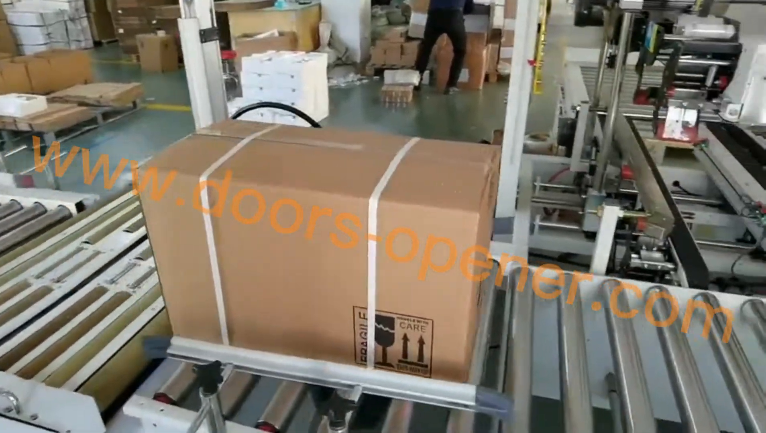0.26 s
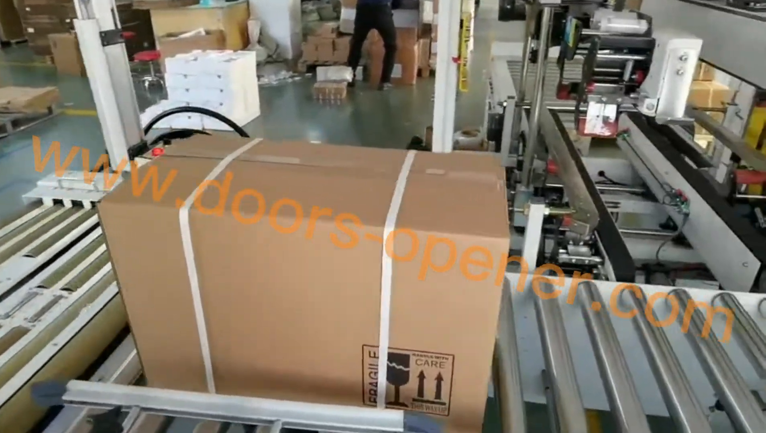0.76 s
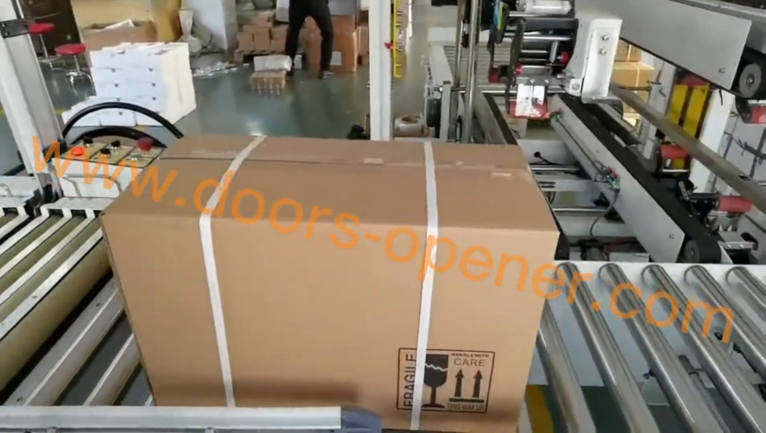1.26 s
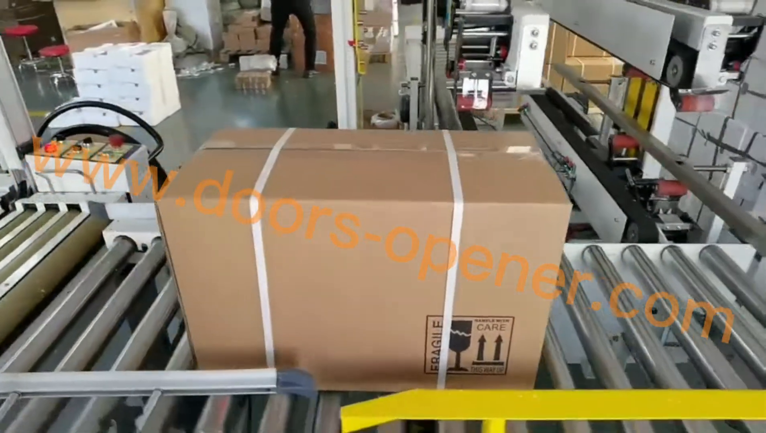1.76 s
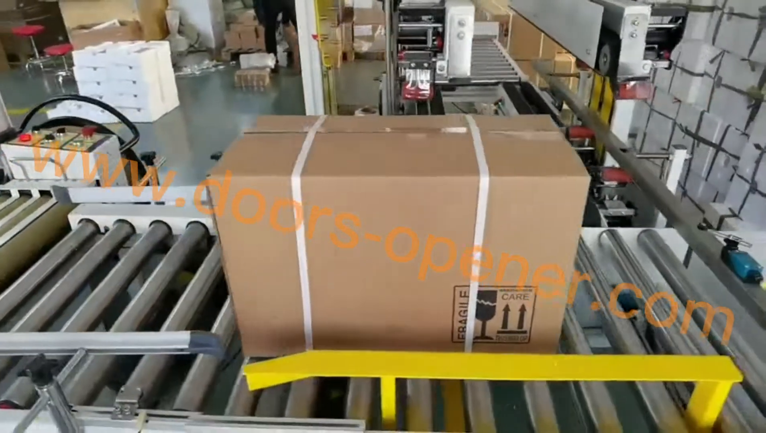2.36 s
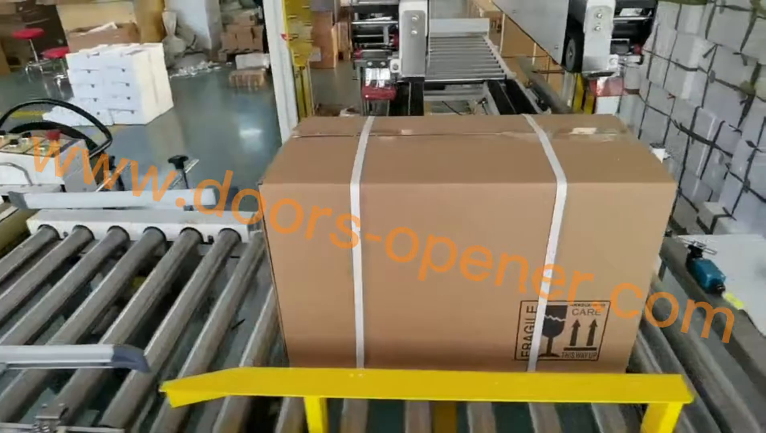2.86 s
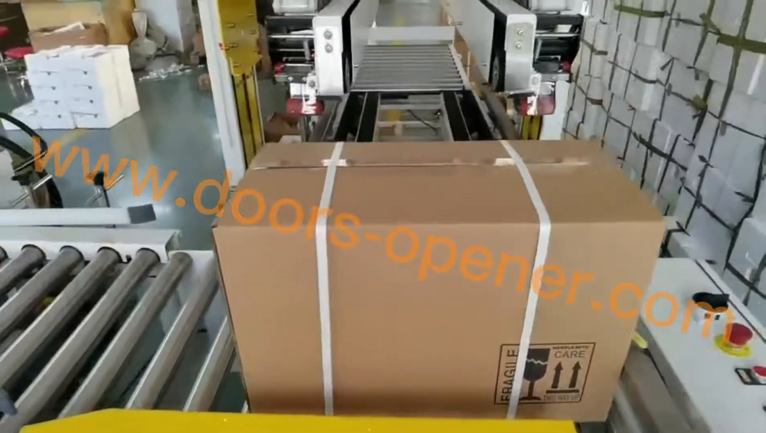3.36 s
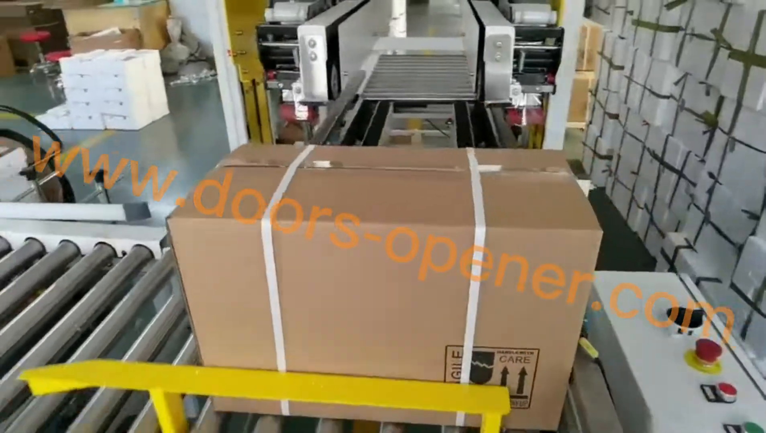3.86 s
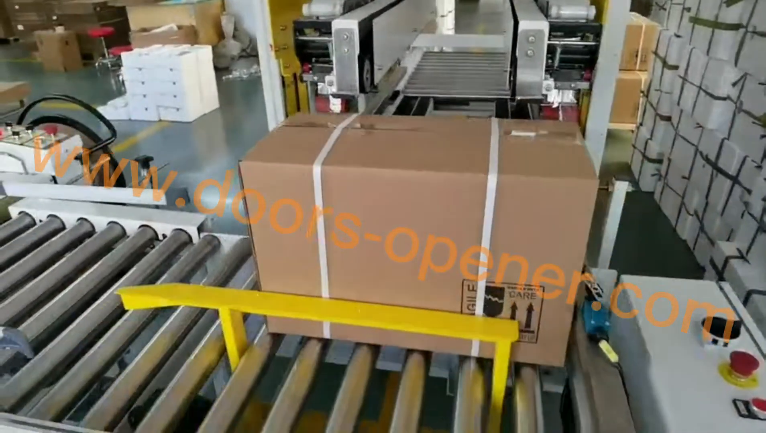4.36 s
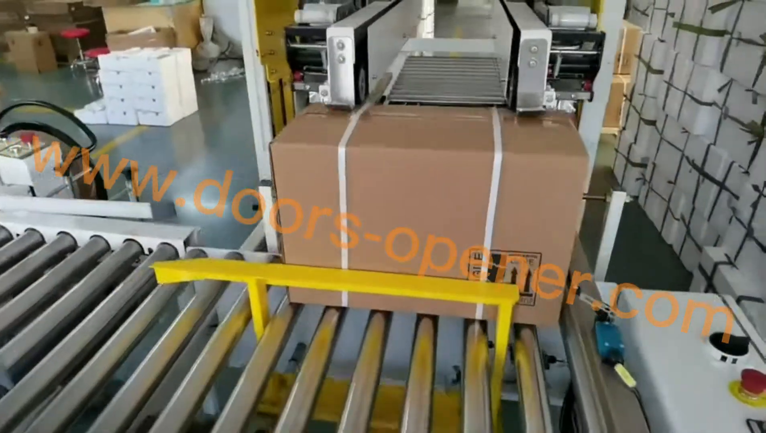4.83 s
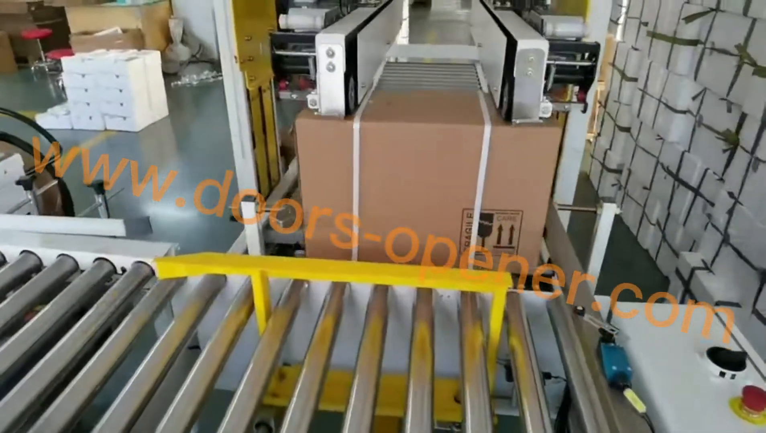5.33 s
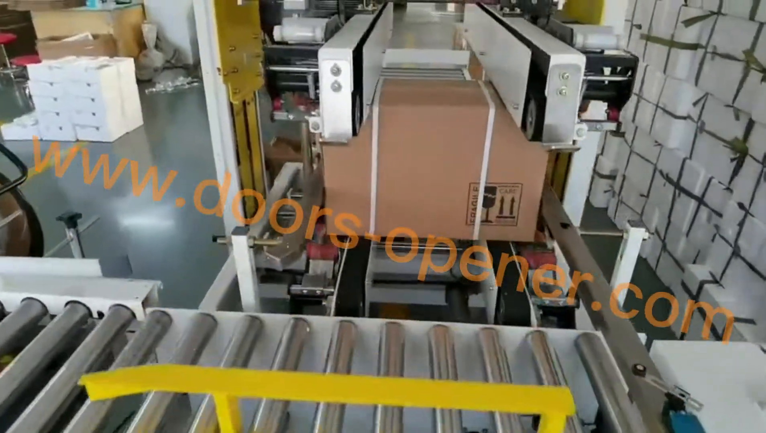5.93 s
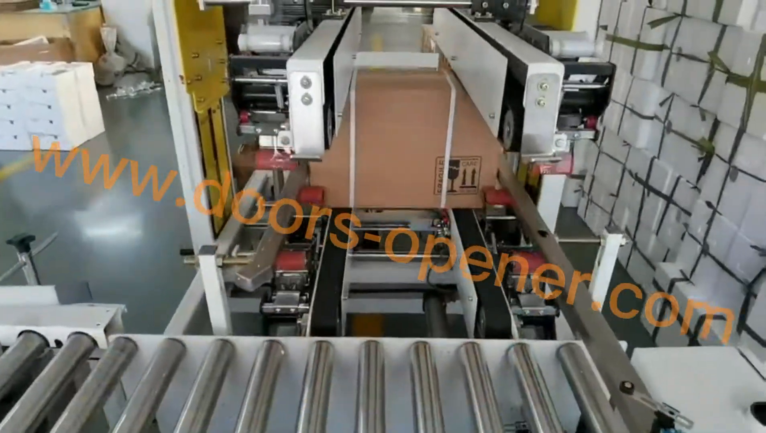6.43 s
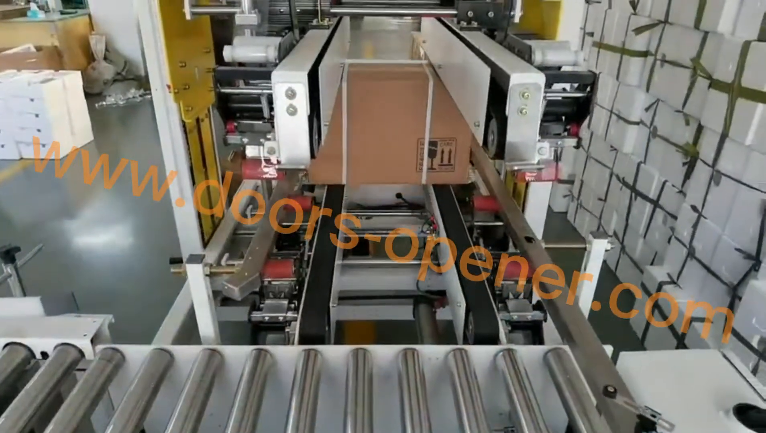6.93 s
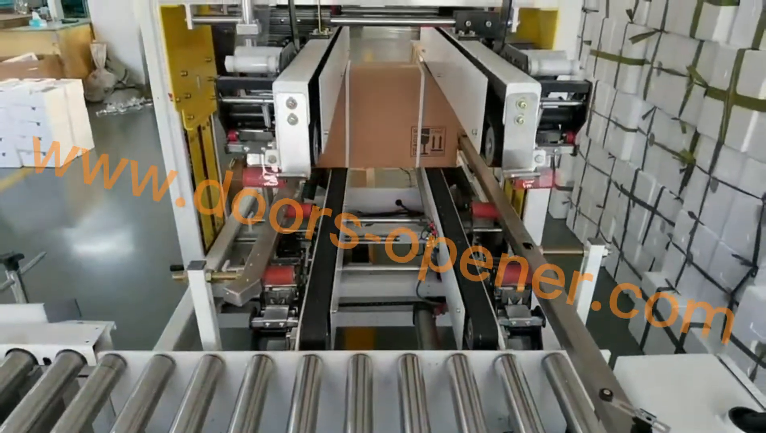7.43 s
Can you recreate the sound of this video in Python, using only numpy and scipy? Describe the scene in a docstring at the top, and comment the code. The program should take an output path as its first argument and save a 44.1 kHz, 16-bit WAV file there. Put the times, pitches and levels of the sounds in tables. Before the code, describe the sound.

Quiet roller hum and metal ticks give way to a sudden loud air burst, knocking cardboard, and long roaring pneumatic hisses, then near quiet.

```python
"""Air valves of a carton sealer vent in long and short blasts: jets of coloured noise with fluttering levels.
A roller conveyor brings the carton: narrow noise bands hum, boom and drone, struck modes thud, metal ticks.
Faint drive whines, gliding narrow noise, sink as the carton turns the corner.
Far leaks and belts fill the large factory hall with coloured hiss."""
import sys
import numpy as np
from scipy import signal
from scipy.fft import rfft, irfft, next_fast_len
from scipy.io import wavfile

SR = 44100
rng = np.random.default_rng(int(sys.argv[2]) if len(sys.argv) > 2 else 0)


def undo_db(level):
    """Turn decibels back into plain size, where 20 dB means ten times bigger."""
    steps = np.asarray(level, float) / 20
    return 10 ** steps


def transcribe(u):
    """Save the signal u as a 16-bit wav file named by the first command-line argument.

    u: samples, shape (n,) or (channels, n), limited to [-1, 1]; the rate is SR.
    q: integer samples, one column per channel.
    """
    v = np.clip(np.atleast_2d(u).T, -1, 1)
    q = np.round(v * 32767).astype(np.int16)
    wavfile.write(sys.argv[1], SR, q)


N = 339129

# hall hiss level: time_s, level_db
HALL_LEVEL = [(0, -42.5), (.5, -44), (1, -41.5), (2, -40.5), (2.85, -39), (3.1, -46), (3.55, -36.5),
              (4, -35.5), (4.6, -34), (4.9, -46), (5.7, -34), (6.0, -42), (6.3, -43.5), (6.7, -47.5),
              (7.69, -48.5)]
# spectrum of the hall hiss: freq_hz, density_db_per_hz (relative, as in all spectra)
HALL_SPECTRUM = [(210, -14.5), (350, -5), (398, 0), (631, -6), (882, -4), (1270, -6), (1870, 2.5),
                 (2570, -5.5), (3010, -1.5), (4010, -4), (6070, 0), (7710, 5.5), (11900, -17), (14600, -19),
                 (15800, -18)]
# resonances on the hall hiss: centre_hz, width_hz, gain_db
HALL_RESONANCES = [(1099, 37, 7), (1710, 63, 2), (3150, 270, 4.5), (4600, 150, 2), (6140, 300, 6.5),
                   (7000, 440, -5.5), (7840, 410, -2.5)]
# likeness of the ears in the hall: freq_hz, shared_power_0_to_1
HALL_LIKENESS = [(60, 1), (180, 1), (550, 0.72), (1650, -0.0), (4970, 0.036), (15000, 0.02)]
# lean of hall sounds: freq_hz, left_minus_right_db
HALL_LEAN = [(60, -3), (180, 4), (550, 2), (1650, 6), (4970, -1), (15000, 5)]
# spectrum of the deep background noise: freq_hz, density_db_per_hz
DEEP_SPECTRUM = [(20, 1), (40, 1), (60, -3), (80, -15), (200, -80)]

# drive whines: start_s, length_s, pitch_hz, end_pitch_hz, level_db
WHINES = [(0.0, 1.6, 306, 302.5, -58.5), (3.48, 0.19, 1640, 1560, -50), (3.66, 0.47, 1840, 1762, -45),
          (3.85, 0.25, 1490, 1407, -46.5), (3.851, 0.14, 402, 371, -45), (4.25, 0.19, 2170, 2130, -43),
          (4.38, 0.13, 1770, 1752, -46)]

# conveyor between jolts: time_s, frame_hum_db, carton_rumble_db
CONVEYOR_IDLE = [(0, -49.5, -53.5), (1.2, -52, -53), (1.45, -62, -51), (2.3, -49, -49), (2.75, -55, -52),
                 (3.3, -48.5, -55.5), (3.85, -53.5, -52), (4.15, -51.5, -58), (4.5, -52, -49.5),
                 (4.85, -59.5, -44.5), (5.0, -60, -51.5), (5.45, -67, -56.5), (5.7, -55, -50.5),
                 (6.1, -57.5, -57), (6.55, -62, -52.5), (6.87, -63, -56), (7.1, -56, -55.5),
                 (7.35, -59, -60), (7.69, -57, -58)]
# frame booms as loads shift: start_s, hold_s, level_db, pitch_hz
BOOMS = [(0.0, 0.071, -42.5, 101.8), (.81, 0.027, -46, 100), (1.055, .02, -56, 100),
         (1.269, 0.016, -47.5, 103.6), (1.323, 0.013, -43, 101), (1.395, .015, -48, 104),
         (1.463, .015, -40.5, 102.3), (1.53, .02, -43, 100), (1.6, 0.017, -43, 96.5),
         (1.777, 0.021, -44, 97), (2.095, .02, -38.5, 102), (2.172, 0.022, -49, 99),
         (2.248, 0.017, -41.5, 100), (2.851, 0.016, -44, 103.4), (2.95, 0.055, -27, 96),
         (3.07, .02, -36, 93.8), (3.141, 0.043, -39, 98.3), (3.444, 0.043, -36, 100),
         (3.569, 0.017, -38, 97.6), (3.617, 0.1, -41.5, 100), (3.753, 0.047, -42.5, 120),
         (3.891, 0.016, -47, 97.7), (3.938, 0.023, -38, 94.8), (4.01, 0.082, -36, 95.3),
         (4.246, 0.06, -32, 102.4), (4.415, 0.031, -38, 101.1), (4.51, 0.016, -41, 97.7),
         (4.595, .02, -37.5, 97), (4.683, 0.018, -35.5, 98.5), (4.807, 0.032, -41.5, 104.2),
         (6.426, 0.032, -35, 96.2), (6.58, 0.039, -49, 102.1), (7.169, 0.048, -46, 93.4),
         (7.245, 0.031, -52.5, 98), (7.429, .05, -54, 100)]
# carton jolts, load drones: start_s, hold_s, level_db, pitch_hz
JOLTS = [(.35, 0.021, -50.5, 157), (.94, .04, -47, 130), (1.302, 0.045, -43, 127), (1.566, 0.064, -44, 145),
         (1.7, 0.055, -47, 227.6), (2.149, .03, -48, 128.4), (2.249, .02, -45, 131.4),
         (2.494, 0.035, -45, 176.6), (2.836, 0.058, -35.5, 166.4), (2.938, 0.021, -34, 124.7),
         (3.04, .02, -41, 136.6), (3.116, 0.046, -35, 167.4), (3.411, .05, -31, 126.2),
         (3.5, .015, -34.5, 165), (3.591, 0.027, -31, 133.6), (3.66, 0.026, -32.5, 148.4),
         (3.733, 0.028, -40, 126), (4.224, 0.088, -28.5, 200.8), (4.36, .09, -41.5, 202.6),
         (4.57, 0.0524, -45.5, 126.4), (4.66, 0.044, -35, 126.7), (4.767, 0.028, -40.5, 145),
         (4.839, 0.023, -37, 168), (5.583, 0.048, -47.5, 221.3), (6.41, 0.074, -48.5, 128),
         (7.172, .04, -49.5, 128.8), (7.658, 0.037, -42.5, 185.5)]
# carton wall knocks: start_s, hold_s, level_db, pitch_hz, rattle_minus_knock_db
KNOCKS = [(0.063, 0.048, -50, 304, -20), (0.413, 0.085, -49.5, 300, -20), (1.279, 0.093, -50, 265, 7),
          (1.607, 0.06, -46, 243, 5.5), (1.682, 0.053, -41, 247, -5), (1.886, 0.073, -47.5, 243, -16),
          (2.254, 0.025, -43.5, 287, -2), (2.483, 0.045, -44, 298.3, -21), (2.834, 0.019, -37, 280.2, -14),
          (2.913, 0.026, -42, 240, 5), (2.969, 0.035, -33, 286.2, -8.5), (3.07, .04, -46, 255, 4),
          (3.127, 0.059, -33, 265, -12), (3.415, .07, -36, 235, -15), (3.584, 0.031, -30, 345.5, -11),
          (3.66, 0.042, -36, 235.2, -8), (3.753, 0.018, -42, 288, -6), (3.862, 0.024, -47, 386.6, -5),
          (4.236, 0.068, -28.5, 238, -19), (4.327, 0.062, -38.5, 292, 0), (4.566, 0.051, -38.5, 237, -0.5),
          (4.68, 0.029, -31.5, 265.4, -4), (4.769, .07, -40, 238, -11), (4.994, .02, -42, 265, -20.5),
          (5.14, 0.11, -45, 386.4, -18), (5.588, 0.051, -39, 255, -13), (5.746, 0.017, -39, 430, -20),
          (6.399, .06, -45.5, 269, -12), (7.118, 0.078, -49, 239.7, -20), (7.655, 0.056, -42, 288.4, -20)]
# spectra of frame, load, walls, loose rollers: freq_hz, density_db_per_hz
BOOM_SPECTRUM = [(18, -63), (30, 9), (59, 4.5), (73, -18), (86, 11.5), (102, 13.5), (124, -18), (150, -8.5),
                 (200, 15), (330, -120)]
LOAD_SPECTRUM = [(68, -12), (115, 10), (129, 4), (204, 4.5), (250, -4.5), (320, -48), (550, -120)]
WALL_SPECTRUM = [(130, -16), (215, -0.5), (231, -9.5), (295, 3), (329, 0.5), (404, -4.5), (520, -16.5),
                 (680, -16), (1140, -120)]
RATTLE_SPECTRUM = [(210, 7), (350, -4.5), (409, 3.5), (579, -12), (657, -2), (715, -3.5), (1000, -7),
                   (1140, -13.5), (1900, -6.5), (2470, -1), (4180, -120)]
# carton thuds: time_s, strike_db
THUDS = [(1.319, -38), (2.27, -29), (2.834, -32), (3.431, -28), (3.577, -15), (3.596, -17), (4.241, -26),
         (4.265, -22), (4.681, -25), (7.116, -37), (7.647, -45.5)]
# modes of carton and frame: freq_hz, gain_db, t60_s
THUD_MODES = [(100, -10, 0.057), (197, 3, .09), (245, 3, 0.1), (371, 0.5, 0.087), (449, 12.5, 0.024),
              (600, 0.5, 0.048), (800, -3, 0.038), (2090, 5, .015)]
# metal ticks: time_s, strike_db, left_minus_right_db
TICKS = [(0.0494, -47, 0.5), (0.195, -23.5, 2), (0.2693, -46, 0.0), (0.5696, -28.5, -1.0),
         (0.6811, -24, -2), (1.0018, -25, 2), (1.3388, -28.5, 4.5), (1.488, -23.5, 5), (1.9207, -27, 0.0),
         (1.987, -25.5, -0.5), (2.1894, -30, 0.0), (2.3692, -21, 2), (2.5094, -32, 2), (2.8543, -25, 2),
         (2.9214, -2.5, 3), (4.2856, -22, -2), (7.1066, -31, 0.0)]
# modes of the metal: freq_hz, width_hz, gain_db
TICK_MODES = [(6260, 810, -6), (8060, 310, 1), (8900, 380, -7), (13000, 2500, -38)]

# far valve puffs: start_s, hold_s, level_db
PUFFS = [(1.564, 0.048, -36), (7.104, 0.0018, -52.5)]
# spectrum of the puffs: freq_hz, density_db_per_hz
PUFF_SPECTRUM = [(290, -46), (500, -18.5), (831, -12), (893, -11.5), (1740, -7.5), (2290, -13.5),
                 (2560, -25), (2780, -10), (3590, -11.5), (9000, -17.5), (11700, -33), (19800, -120)]
# whistles, low rattles and a pipe ring: start_s, length_s, centre_hz, pole_width_hz, level_db
SHORT_BANDS = [(2.837, 0.077, 5250, 1300, -37.5), (2.847, 0.053, 7045, 163, -24.5),
               (2.921, .025, 10030, 300, -20), (2.965, .06, 10100, 76.4, -35),
               (3.01, 0.057, 2890, 150, -34), (3.041, .08, 659, 120, -44), (3.26, 0.045, 2310, 149.4, -37),
               (4.239, 0.039, 7220, 480, -25), (4.2862, 0.0053, 7450, 1172, -15),
               (4.292, 0.0091, 7840, 800, -23), (4.549, 0.053, 808, 100, -47),
               (5.85, 0.14, 910, 199.4, -43), (6.213, 0.035, 4630, 600, -34.5),
               (6.24, 0.053, 4030, 600, -37.5), (6.38, 0.047, 800, 249.4, -41),
               (6.443, 0.054, 874, 152.2, -30.5), (6.492, 0.085, 860, 299, -44)]
# first blast, then the swell into the next: time_s, hiss_db
FIRST_VENT_LEVEL = [(2.8, -52), (2.85, -46), (2.896, -38), (2.904, -30.5), (2.916, -24.5), (2.926, -16.5),
                    (2.952, -16.5), (3.154, -20), (3.418, -25.5), (3.65, -26.5), (3.742, -28), (4.026, -27),
                    (4.116, -25.5), (4.244, -27.5), (4.35, -27), (4.57, -28.5), (4.69, -24), (4.75, -33)]
# spectra of first valve and its throat: freq_hz, density_db_per_hz
FIRST_VENT_SPECTRUM = [(2530, -48), (4300, -10.5), (5200, -13.5), (5550, -7.5), (6260, -6), (6790, -9),
                       (8040, -0.5), (8920, -7.5), (10900, -10), (11800, -21.5), (13900, -25), (15200, -38),
                       (15500, -31), (15800, -46)]
THROAT_SPECTRUM = [(880, -15), (1500, -7.5), (1770, -3), (2020, -1), (2250, 9.5), (3010, 5.5), (3550, 10),
                   (4400, -6.5), (4700, -19), (6110, -34), (10300, -120)]
# sealer cylinder blasts: start_s, hold_s, hiss_db, roar_pipe_extra_db, edge_extra_db
BLASTS = [(4.697, 0.13, -22.5, -6.5, 3), (4.789, 0.069, -31.5, -8, 11.5), (4.859, 0.074, -20, -4, 5),
          (4.961, 0.32, -18.5, -1, 1.5), (5.3, 0.28, -19, -0.5, 2.5), (5.611, 0.16, -19, 0, 2.5),
          (5.8, 0.072, -27.5, -0.5, -6), (5.843, 0.011, -23, -1, -12), (5.854, 0.047, -19, -1, -23),
          (6.0, 0.077, -39.5, -3, 6.5), (6.09, 0.055, -36.5, -4.5, 1), (6.168, .04, -40, -11, 7),
          (6.223, 0.039, -26, -21.5, -2.5), (6.302, .01, -27.5, -10, -8),
          (6.327, 0.0062, -20.5, -10.5, -13), (6.353, 0.034, -24.5, -14, 2), (6.393, 0.07, -18, -1.5, -6),
          (7.686, 0.058, -28.5, -10, 7)]
# jet parts hiss, sizzle, roar, pipe, edge: level_minus_hiss_db, fall_db_per_s, surge_db
JET_PARTS = [(-1.5, 283, 0.36), (-8.5, 192, 0), (-12.5, 157, -0.5), (-17, 130., 0.54), (-9.5, 350., -1.5)]
# rise of the same five parts: rise_db_per_s
JET_RISES_DB_PER_S = 900., 800., 350., 280., 900.
# spectra of the jet parts: freq_hz, density_db_per_hz
HISS_SPECTRUM = [(2940, -36), (5000, -18.5), (8030, 5), (9900, -7), (11800, -23), (15300, -26),
                 (22000, -120)]
SIZZLE_SPECTRUM = [(1880, -25), (3200, -10.5), (4710, -10.5), (6000, -6), (7800, -17), (13200, -120)]
ROAR_SPECTRUM = [(680, -31), (1150, -6.5), (1490, 0), (1620, 0), (1750, 2), (2160, 4.5), (2360, 3.5),
                 (3800, -7.5), (4940, -24), (8360, -120)]
PIPE_SPECTRUM = [(160, -8), (280, -8), (344, -10.5), (520, -4), (569, -4.5), (754, 0), (884, -3.5),
                 (1030, -5.5), (1450, -3), (1880, -10), (3190, -120)]
EDGE_SPECTRUM = [(6470, 6), (11000, 0.5), (12100, -5), (14900, -4.5), (15400, -3), (15900, -26)]
# straight arrival of the jets: freq_hz, shared_power_0_to_1
JET_DIRECT = [(200, 1), (600, 0.9), (1500, 0.6), (4000, 0.22), (15000, 0.05)]
# lean of the jets: freq_hz, left_minus_right_db
JET_LEAN = [(60, 1.0), (130, -5), (290, -2), (640, 0), (1410, 4), (3100, 2), (6820, -3), (15000, 6.5)]
# side of the venting: time_s, left_minus_right_db
VENT_SIDE = [(2.8, 6), (2.92, 1.5), (3.16, 1), (3.4, -2), (3.7, -2.5), (4.25, -2.5), (4.75, -1),
             (4.86, 0.5), (5.3, 2.5), (5.75, 1), (6.25, 2.3), (7.69, 4)]

HUM_HZ, DRONE_HZ, WALL_HZ = 100., 145., 265.
HUM_WAVER, DRONE_WAVER, WALL_WAVER = 0.019, 0.1292, 0.1   # rms share of pitch
HUM_LUMP_DB, LUMP_DB, LUMP_BAND_HZ = 1, 3, 10.9
BOOM_RISE_DB_PER_S, BOOM_FALL_DB_PER_S = 400., 253
JOLT_RISE_DB_PER_S, JOLT_FALL_DB_PER_S = 445, 179.5
RATTLE_START_S, RATTLE_END_S = 1.4, 5.6   # carton on the near rollers
RATTLE_IDLE_DB = -5   # against the rumble
DEEP_DB = -57
WHINE_WIDTH = 0.016   # pole width as share of pitch
PUFF_RISE_DB_PER_S, PUFF_FALL_DB_PER_S, PUFF_BROAD_FADE_DB_PER_S = 900., 148, 56
PUFF_HZ, PUFF_LOWEST_HZ = 2440, 656
PUFF_SINK_HZ_PER_S, PUFF_SINKS_AFTER_S = 11000., 0.055
THROAT_DB, THROAT_LAG_S = -17, 0.018   # noise part against the hiss
THROAT_HZ, THROAT_HZ_PER_DB, THROAT_WAVER = 2657, 29, .06   # pitch at -26.5 dB of hiss
FIRST_EDGE_DB, FIRST_EDGE_FOLLOWS = -33, 1.6   # at -19 dB of hiss; dB per dB
SIZZLE_FOLLOWS = 0.1   # share of the roar's extra
SURGE_BAND_HZ = 25
CRACKLE_DB, CRACKLE_BAND_HZ = 1.5, 250
MIC_LOW_HZ = 82


def rms_one(x):
    """Scales to rms 1."""
    return x / np.sqrt(np.mean(x ** 2) + 1e-20)


def in_time(rows):
    """Table columns as per-sample curves; -120 outside the table."""
    s, *columns = np.transpose(rows)
    return [np.interp(np.arange(N) / SR, s, c, left=-120, right=-120) for c in columns]


def at_hz(points, hz):
    """Reads a spectrum on a log frequency axis."""
    points = np.array(points)
    return np.interp(np.log(hz), np.log(points[:, 0]), points[:, 1])


def drift(band_hz):
    """Slow noise of rms 1: two equal poles of width band_hz, run at SR / 40."""
    r = np.exp(-80 * np.pi * band_hz / SR)
    slow = signal.lfilter([1], [1, -2 * r, r * r], rng.standard_normal(N // 40 + 2002))[2000:]
    return np.interp(np.arange(N) / 40, np.arange(len(slow)), rms_one(slow))


def panned(x, left_minus_right_db):
    """Splits a level difference, limited to 12 dB, between the ears."""
    return x * undo_db(np.clip(left_minus_right_db, -12, 12) / 2 * np.array([[1], [-1]]))


def reflections(hz, grain_hz=40.5, depth_db=6.0):
    """Echoes from walls and machines: random fine spectral ripple at each ear, in dB."""
    knots = np.arange(0, SR / 2 + 200, max(grain_hz, 10))
    ripple = np.tanh(rng.standard_normal((2, SR // 10))[:, :len(knots)])
    return np.array([np.interp(hz, knots, depth_db * ear) for ear in ripple])


def noise(spectrum, likeness, lean, lag_s=0.):
    """Coloured stereo noise: shared part, late on the left by lag_s, plus diffuse part; mid rms 1."""
    size = next_fast_len(N)
    hz = np.maximum(np.arange(size // 2 + 1) * SR / size, 1)
    octaves_below = np.maximum(np.log2(spectrum[0][0] / hz), 0)
    shape = undo_db(at_hz(spectrum, hz) - 20 * octaves_below)
    shared, left, right = rfft(rng.standard_normal((3, size)))
    alike = np.clip(at_hz(likeness, hz), 0, 1)
    direct, diffuse = np.sqrt(alike) * shared, np.sqrt(1 - alike)
    late = np.exp(-2j * np.pi * hz * lag_s)
    pair = np.array([direct * late + diffuse * left, direct + diffuse * right])
    rippled = pair * undo_db(reflections(hz) * diffuse)
    out = irfft(panned(rippled * shape, at_hz(lean, hz)), size)[:, :N]
    return out / np.sqrt(np.mean(out.mean(0) ** 2))


def hall_noise(spectrum):
    """Coloured noise with the hall's stereo image."""
    return noise(spectrum, HALL_LIKENESS, HALL_LEAN)


def narrow(hz, pole_width_hz, alike=0.95, steady=.0):
    """Noise band around a moving centre; steady 0-1 evens its envelope towards a tone; rms 1."""
    r = np.exp(-np.pi * pole_width_hz / SR)
    white = rng.standard_normal((2, 2, len(hz) + SR // 4))
    real, imaginary = signal.lfilter([1], [1, -2 * r, r * r], white)[..., SR // 4:]
    wander = real + 1j * imaginary
    evenness = np.clip(steady, 0, 1)
    wander = wander / np.abs(wander) ** evenness * np.std(wander) ** evenness
    carrier = np.exp(2j * np.pi * np.cumsum(np.maximum(hz, 0)) / SR)
    mid, side = (carrier * wander).real
    share = np.clip(alike, 0, 1)
    return rms_one(np.sqrt(1 + share) * mid + np.sqrt(1 - share) * side * [[1], [-1]])


def swells(starts_s, holds_s, levels_db, rise_db_per_s, fall_db_per_s):
    """Event levels in dB, one row each, per millisecond: rise up to the start, hold, fall."""
    t = np.arange(0, N / SR + .002, .001)
    early_s = np.maximum(starts_s[:, None] - t, 0)
    late_s = np.maximum(t - (starts_s + np.maximum(holds_s, 0))[:, None], 0)
    return levels_db[:, None] - rise_db_per_s * early_s - fall_db_per_s * late_s


def per_sample(slow):
    """Interpolates milliseconds to samples."""
    return np.interp(np.arange(N) / SR * 1000, np.arange(len(slow)), slow)


def over_idle(events_db, values, idle_db, idle_value):
    """Adds event power to idle power; returns gain and the power-weighted value (a pitch)."""
    power, idle = undo_db(2 * events_db), undo_db(2 * idle_db)
    total = per_sample(power.sum(0)) + idle
    return np.sqrt(total), (per_sample(values @ power) + idle * idle_value) / total


def fading_bands(rows):
    """Narrow noise bands that glide and fade in and out."""
    out = np.zeros((2, N))
    for start_s, length_s, hz, end_hz, pole_width_hz, level_db in rows:
        at, count = round(start_s * SR), round(length_s * SR)
        glide_hz = np.full(2 * SR, float(end_hz))
        glide_hz[:count] = np.linspace(hz, end_hz, count)
        tone = narrow(glide_hz, pole_width_hz, alike=0.55, steady=0.43)[:, :count]
        out[:, at:at + count] += undo_db(level_db) * signal.windows.tukey(count, .4) * tone
    return out


def deep_background():
    """Steady deep background noise, 20-70 Hz, nearly alike at both ears."""
    return undo_db(DEEP_DB) * noise(DEEP_SPECTRUM, [(20, 0.76), (200, .9)], [(20, 1.), (200, 1.)])


def hall():
    """Far leaks and belts: hiss through a few resonances, its level flickering."""
    hz = np.geomspace(200, 16000, num=400)
    peaks_db = sum(db / (1 + (2 * (hz - centre_hz) / width_hz) ** 2)
                   for centre_hz, width_hz, db in HALL_RESONANCES)
    spectrum = np.transpose([hz, at_hz(HALL_SPECTRUM, hz) + peaks_db])
    flicker = undo_db(1.37 * drift(23.0) + 0.26 * drift(1.4))
    return undo_db(in_time(HALL_LEVEL)[0]) * flicker * hall_noise(spectrum)


def drive_whines():
    """Drives whine: narrow noise gliding down."""
    return fading_bands([(s, length_s, hz, end_hz, WHINE_WIDTH * hz, db)
                         for s, length_s, hz, end_hz, db in WHINES])


def frame():
    """The frame hums near 100 Hz and booms when a load shifts: narrow band plus broad noise."""
    s, hold_s, level_db, hz = np.transpose(BOOMS)
    booms_db = swells(s, hold_s, level_db, BOOM_RISE_DB_PER_S, BOOM_FALL_DB_PER_S)
    hum_db = in_time(CONVEYOR_IDLE)[0] + HUM_LUMP_DB * drift(LUMP_BAND_HZ)
    hum_hz = HUM_HZ * (1 + HUM_WAVER * drift(4.17))
    gain, boom_hz = over_idle(booms_db, hz, hum_db, hum_hz)
    boom = narrow(boom_hz, 10.4, steady=1.0) + undo_db(-8.5) * hall_noise(BOOM_SPECTRUM)
    return panned(gain * boom, 1.8)


def knock_levels():
    """Level rows of the carton wall knocks."""
    s, hold_s, level_db, _, _ = np.transpose(KNOCKS)
    return swells(s, hold_s, level_db, JOLT_RISE_DB_PER_S, JOLT_FALL_DB_PER_S)


def carton():
    """Load and walls drone as the carton jolts; uneven rollers make the rumble lumpy."""
    rumble_db = in_time(CONVEYOR_IDLE)[1]
    s, hold_s, level_db, hz = np.transpose(JOLTS)
    jolts_db = swells(s, hold_s, level_db, JOLT_RISE_DB_PER_S, JOLT_FALL_DB_PER_S)
    idle_hz = DRONE_HZ * (1 + DRONE_WAVER * drift(6.06))
    load_gain, load_hz = over_idle(jolts_db, hz, rumble_db + LUMP_DB * drift(LUMP_BAND_HZ), idle_hz)
    load = undo_db(-4.0) * narrow(load_hz, 24.0, alike=0.93, steady=0.28)
    load = load + undo_db(-5.5) * hall_noise(LOAD_SPECTRUM)
    hz = np.transpose(KNOCKS)[3]
    idle_hz = WALL_HZ * (1 + WALL_WAVER * drift(6.))
    wall_gain, wall_hz = over_idle(knock_levels(), hz, rumble_db + LUMP_DB * drift(LUMP_BAND_HZ), idle_hz)
    walls = undo_db(-5.5) * narrow(wall_hz, 22.0, alike=1.0, steady=0.89)
    walls = walls + undo_db(-5.5) * hall_noise(WALL_SPECTRUM)
    return undo_db(0.84 * drift(26.0)) * (load_gain * load + wall_gain * walls)


def loose_rollers():
    """Loose rollers rattle with the knocks and the rumble: broad noise while the carton is near."""
    _, _, _, hz, rattle_db = np.transpose(KNOCKS)
    idle_db = in_time(CONVEYOR_IDLE)[1] + RATTLE_IDLE_DB
    gain, _ = over_idle(knock_levels() + rattle_db[:, None], hz, idle_db, 0)
    ramp_s = [RATTLE_START_S - .05, RATTLE_START_S, RATTLE_END_S - .05, RATTLE_END_S]
    near = np.interp(np.arange(N) / SR, ramp_s, [0, 1, 1, 0])
    return near * gain * undo_db(0.43 * drift(25.)) * hall_noise(RATTLE_SPECTRUM)


def thuds():
    """Each blow strikes the modes of carton and frame with random strengths."""
    at, out = [round(s * SR) for s, _ in THUDS], np.zeros(N)
    spread_db = rng.normal(0, 1.3, (len(at), len(THUD_MODES)))
    for k, (hz, gain_db, t60_s) in enumerate(THUD_MODES):
        clicks = np.full(N, 1e-18)
        clicks[at] = undo_db(np.array(THUDS)[:, 1] + gain_db - 17.5 + spread_db[:, k])
        r, w = undo_db(-60 / (t60_s * SR)), 2 * np.pi * hz / SR
        out += signal.lfilter([0, np.sin(w)], [1, -2 * r * np.cos(w), r * r], clicks)
    return panned(out, 1.5)


def ticks():
    """Dying noise bursts, fast decay over a weaker slow one, ring the resonances of the metal."""
    struck, t = np.zeros((2, N)), np.arange(SR // 8) / SR
    decay = undo_db(-60 * t / 0.051) + undo_db(-10.5) * undo_db(-60 * t / 0.22)
    for s, strike_db, pan_db in TICKS:
        burst = rng.standard_normal((2, len(t))) * decay
        at = int(s * SR)
        struck[:, at:at + len(t)] += panned(undo_db(strike_db + 2) * burst, pan_db)
    rung = 0
    for hz, width_hz, gain_db in TICK_MODES:
        r = np.exp(-np.pi * width_hz / SR)
        zeros = [(1 - r * r) / 2, 0, (r * r - 1) / 2]
        poles = [1, -2 * r * np.cos(2 * np.pi * hz / SR), r * r]
        rung = rung + undo_db(gain_db) * signal.lfilter(zeros, poles, struck + 1e-18)
    return rung


def puffs():
    """A far valve puffs: fading broad noise plus a noise band whose centre sinks."""
    broad, out = hall_noise(PUFF_SPECTRUM), 0
    s, hold_s, level_db = np.transpose(PUFFS)
    rows_db = swells(s, hold_s, level_db, PUFF_RISE_DB_PER_S, PUFF_FALL_DB_PER_S)
    for start_s, row_db in zip(s, rows_db):
        since_s = np.arange(N) / SR - start_s
        sunk_hz = PUFF_SINK_HZ_PER_S * (since_s - PUFF_SINKS_AFTER_S)
        centre_hz = np.clip(PUFF_HZ - sunk_hz, PUFF_LOWEST_HZ, PUFF_HZ)
        broad_gain = undo_db(-1.0 - PUFF_BROAD_FADE_DB_PER_S * np.clip(since_s, 0, 1))
        band = undo_db(1.0) * narrow(centre_hz, 560.0, alike=.2)
        out = out + per_sample(undo_db(row_db)) * (broad_gain * broad + band)
    return undo_db(2.7 * drift(40.)) * out


def short_bands():
    """Short narrow noise bands: whistles, low rattles and a pipe ring."""
    return fading_bands([(s, length_s, hz, hz, pole_width_hz, db)
                         for s, length_s, hz, pole_width_hz, db in SHORT_BANDS])


def first_vent():
    """A sudden blast sags, then hiss swells into the next; the throat lags and moves in pitch with the level."""
    hiss_db, = in_time(FIRST_VENT_LEVEL)
    flutter = undo_db(0.73 * drift(24.0))
    even_lean = [(100, .1), (15000, .1)]
    hiss = noise(FIRST_VENT_SPECTRUM, JET_DIRECT, even_lean, lag_s=.00003)
    hiss = undo_db(hiss_db + 0.32 * drift(4.9)) * hiss
    # a louder jet is brighter
    edge_db = FIRST_EDGE_DB + FIRST_EDGE_FOLLOWS * np.minimum(hiss_db + 19, 1.)
    hiss = hiss + undo_db(edge_db) * noise(EDGE_SPECTRUM, JET_DIRECT, JET_LEAN)
    r = np.exp(-1 / (THROAT_LAG_S * SR))
    filling = signal.lfilter([1 - r], [1, -r], undo_db(hiss_db + THROAT_DB + 2.07 * drift(25.0)))
    throat_hz = THROAT_HZ + THROAT_HZ_PER_DB * np.clip(hiss_db + 26.5, -10, 20)
    throat_hz = throat_hz * (1 + THROAT_WAVER * drift(8.))
    throat = noise(THROAT_SPECTRUM, JET_DIRECT, JET_LEAN, lag_s=.00003)
    throat = throat + undo_db(1.5) * narrow(throat_hz, 420.0, alike=0.11)
    return flutter * (panned(hiss, in_time(VENT_SIDE)[0]) + filling * throat)


def sealer_vent():
    """Turbulent jets: hiss, sizzle, roar, pipe and top edge flutter together, each with its own rise and fall."""
    s, hold_s, hiss_db, low_db, edge_db = np.transpose(BLASTS)
    out, shared = 0, drift(SURGE_BAND_HZ)
    spectra = HISS_SPECTRUM, SIZZLE_SPECTRUM, ROAR_SPECTRUM, PIPE_SPECTRUM, EDGE_SPECTRUM
    extras_db = 0, SIZZLE_FOLLOWS * low_db, low_db, low_db, edge_db
    for spectrum, extra_db, rise, part in zip(spectra, extras_db, JET_RISES_DB_PER_S, JET_PARTS):
        part_db, fall, surge_db = part
        blasts_db = swells(s, hold_s, hiss_db + part_db + extra_db, rise, fall)
        surge = undo_db(surge_db * (0.89 * shared + 0.41 * drift(SURGE_BAND_HZ)))
        gain = per_sample(np.sqrt(undo_db(2 * blasts_db).sum(0))) * surge
        out = out + gain * noise(spectrum, JET_DIRECT, JET_LEAN, lag_s=.00009)
    # the jets spit
    flutter = undo_db(1.12 * drift(30.8) + CRACKLE_DB * drift(CRACKLE_BAND_HZ))
    return flutter * panned(out, in_time(VENT_SIDE)[0])


def scene():
    """Sums all sources."""
    conveyor = frame() + carton() + loose_rollers() + thuds() + ticks()
    air = puffs() + short_bands() + first_vent() + sealer_vent()
    return deep_background() + hall() + drive_whines() + conveyor + air


def top_cut(x):
    """Nothing passes above the cut-off."""
    return signal.sosfilt(signal.butter(12, 15700, fs=SR, output="sos"), x)


def record(dry):
    """The microphone loses deep bass; a soft limiter rounds the highest peaks."""
    high_pass = signal.butter(3, MIC_LOW_HZ, "high", fs=SR, output="sos")
    heard = signal.sosfilt(high_pass, dry)
    limited = heard / (1 + np.abs(heard / .95) ** 6) ** (1 / 6)
    return top_cut(limited)


dry = scene()
out = record(dry)
transcribe(out)
```